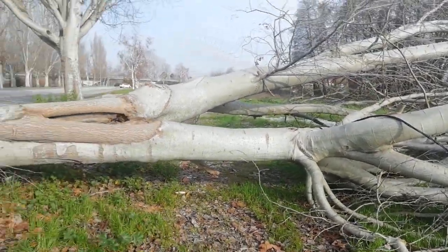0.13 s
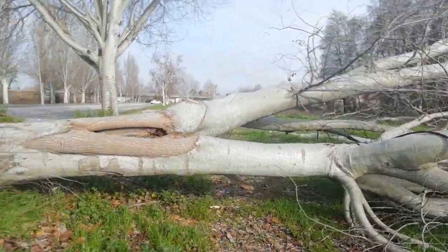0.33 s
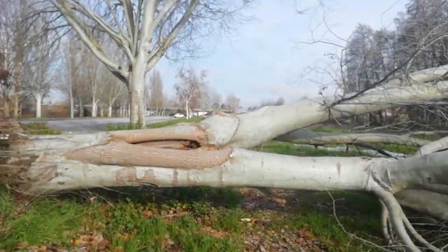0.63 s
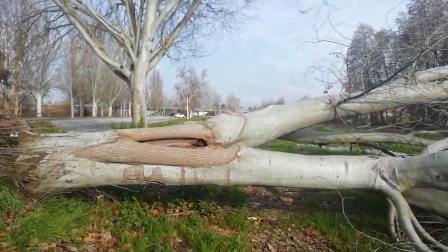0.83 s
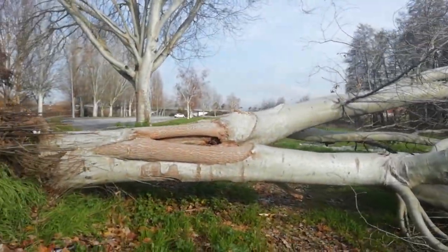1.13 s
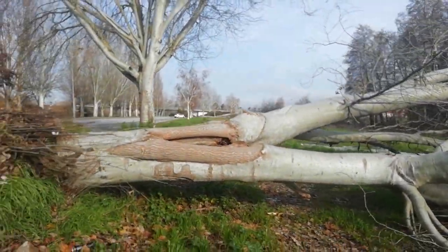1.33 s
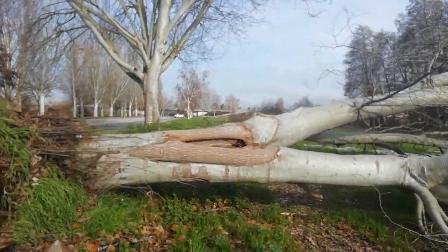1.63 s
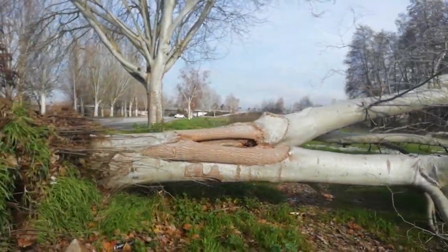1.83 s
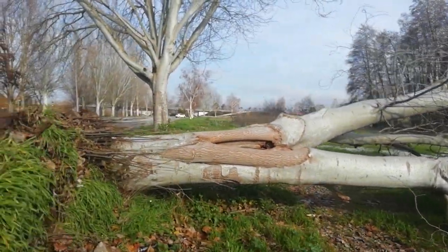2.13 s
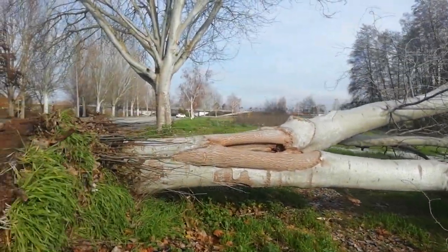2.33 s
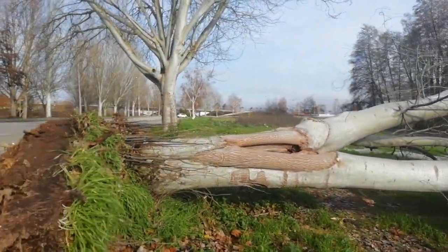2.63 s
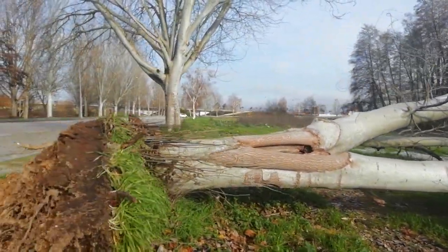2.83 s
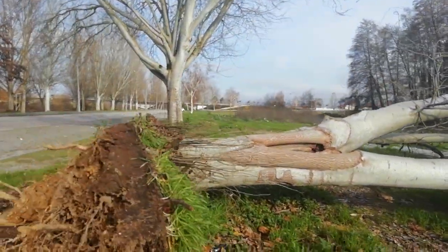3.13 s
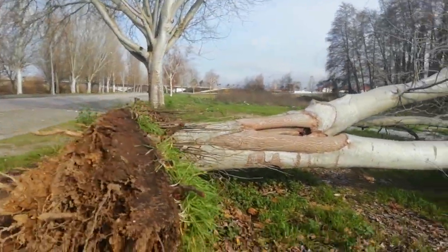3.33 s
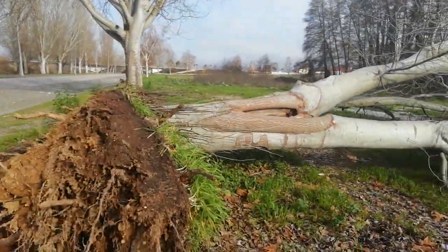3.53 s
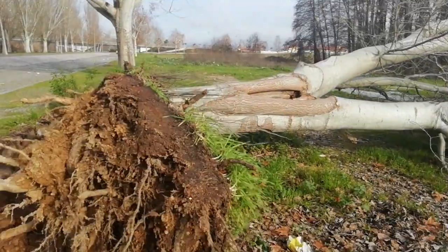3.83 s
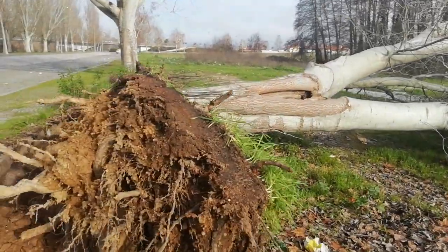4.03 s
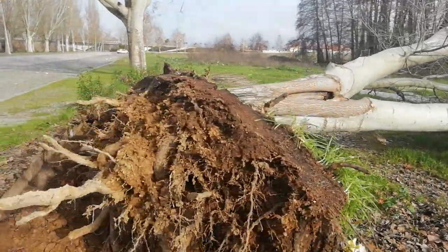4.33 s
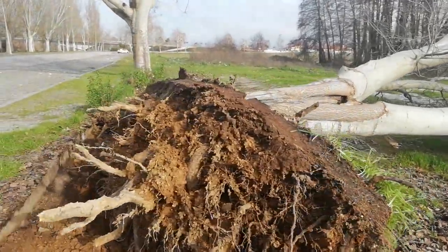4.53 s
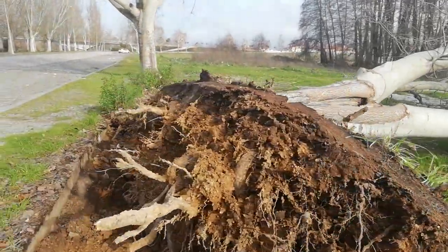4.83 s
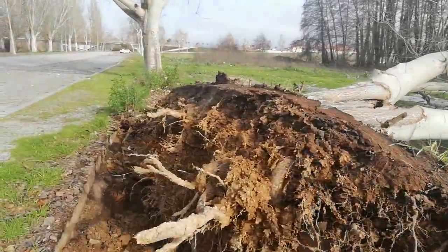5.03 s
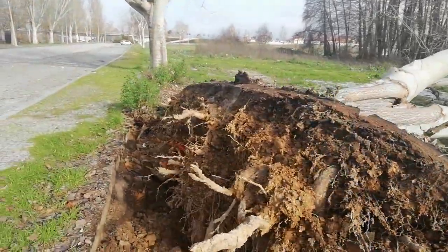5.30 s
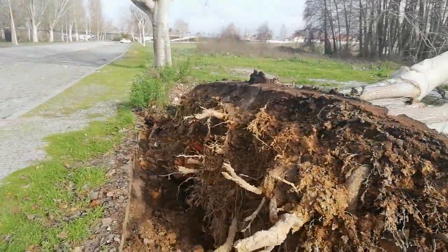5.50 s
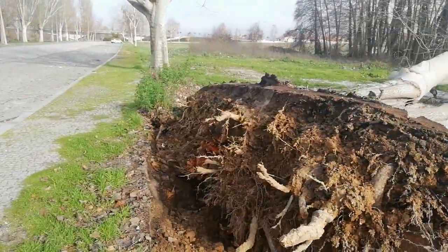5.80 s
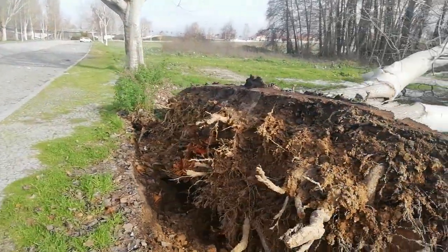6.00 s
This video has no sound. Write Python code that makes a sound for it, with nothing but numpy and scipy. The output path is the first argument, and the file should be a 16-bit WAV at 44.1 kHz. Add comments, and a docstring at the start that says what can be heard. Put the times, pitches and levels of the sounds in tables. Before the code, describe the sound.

A person walks at an unhurried pace through crisp litter outdoors, about eight steps in six seconds. Leaves rustle brightly, stalks click and small twigs crack; long grass rasps against the shoes. The crunch near five seconds is the strongest. Two very short, high gliding bird calls sit faintly to the left, over low distant tyre and engine rumble and slight hiss. The open-air stereo microphone is close to the feet, with a sharp treble.

```python
"""Slow footsteps cross grass, dead leaves and twigs: each one thuds softly, crushes litter and brushes leaves.
Litter and rasping long grass are showers of tiny ringing breaks, driven by the swell of every step and brush.
Twigs and stalks snap as short runs of parting fibres; the soft soil is filtered noise.
A small bird whistles two short gliding calls, echoed by a faint wash.
Behind it all lie distant tyres and rumbling engines, both coloured noise, and a faint hiss."""
import sys
import numpy as np
from scipy import signal
from scipy.fft import rfft, irfft
from scipy.io import wavfile
from scipy.ndimage import uniform_filter1d, map_coordinates

SR = 44100
rng = np.random.default_rng(int(sys.argv[2]) if len(sys.argv) > 2 else 0)


def generate_wav(sig):
    """Save sig (samples, or channels by samples) to the path in sys.argv[1] as 16-bit PCM at SR."""
    pcm = np.round(np.clip(np.atleast_2d(sig).T, -1, 1) * 32767).astype(np.int16)
    wavfile.write(sys.argv[1], SR, pcm)


N = 271656
TIME = np.arange(N) / SR

# A sole comes down; attacks and releases span 20 dB, side is left minus right:
# (full weight [s], attack [s], hold [s], leaf rustle [dB], crunch [dB], soil thud [dB], side [dB])
STEPS = [(0.176, 0.0085, .075, -41, -42.5, -67, 1), (1.1, .074, .008, -31.5, -42.5, -62, 0.5),
         (1.858, 0.01612, .055, -55, -37.5, -50, -2), (2.745, .028, .04, -38, -44.5, -63, -0.5),
         (3.535, .1, .012, -37.5, -40.5, -50, 0.5), (4.206, .045, .024, -32, -40.5, -55, -1),
         (4.927, .064, 0.004, -30, -33, -48.5, -0.5), (5.55, 0.005, .032, -34, -38, -57, -1.5)]
STEP_RELEASE_S = .06
SETTLE_DB, SETTLE_RELEASE_S = -13, .27   # the litter goes on giving way under the weight
# A moving foot brushes through the litter:
# (peak [s], attack [s], release [s], leaf rustle [dB], crunch [dB], side [dB])
BRUSHES = [(0.31, 0.13, .07, -52, -55, 0.5), (0.665, 0.53, 0.055, -58, -63, -4),
           (1.26, 0.086, .28, -46.5, -55, -1.5), (1.44, .04, .3, -38.5, -49, -5),
           (1.782, 0.015, .07, -47, -58, -1), (1.908, .055, 0.061, -39, -44, 4),
           (1.965, 0.03, .16, -38.5, -42.5, 0.5), (2.06, 0.07, 0.11, -43, -49, 1.5),
           (2.26, 0.2, .11, -46, -50, -4.5), (2.61, 0.14, 0.42, -52, -61, -1),
           (2.875, 0.0517, .06, -40, -44, -1), (2.99, 0.11, .15, -41, -49, -6),
           (3.168, 0.12, .035, -45, -58.5, -4.5), (3.762, 0.04, 0.03, -49, -56, -5),
           (4.345, 0.062, .2, -44, -51.5, -2.5), (4.495, 0.19, 0.033, -41, -54, -6.5),
           (4.584, 0.013, .07, -39, -71, -13), (4.636, 0.022, .025, -38, -43, -2),
           (4.815, .02, .045, -30.5, -38.5, 1), (5.07, .12, 0.13, -46, -55.5, -5.5),
           (5.178, 0.037, .02, -38, -51, -6), (5.32, 0.038, .4, -56, -70, -5),
           (5.83, 0.36, .11, -41.5, -46.5, -8), (5.93, 0.03, .05, -43, -62, -17),
           (6.06, 0.076, .07, -49, -68, -8)]
STIR_LEAVES_DB, STIR_CRUNCH_DB = -71, -70   # trodden grass springing back, a steady floor


def feet():
    """Steps and brushes add in power to a leaf level, a crunch level and a power-weighted side, all in dB."""
    gestures = [(np.ones(N), STIR_LEAVES_DB, STIR_CRUNCH_DB, 0)]
    for s, attack_s, hold_s, leaves_db, crunch_db, _, side_db in STEPS:
        landing = swell(s, attack_s, hold_s, STEP_RELEASE_S)
        settling = from_db(SETTLE_DB) ** 2 * swell(s, attack_s, hold_s, SETTLE_RELEASE_S)
        gestures.append((landing + settling, leaves_db, crunch_db, side_db))
    for s, attack_s, release_s, leaves_db, crunch_db, side_db in BRUSHES:
        gestures.append((swell(s, attack_s, 0, release_s), leaves_db, crunch_db, side_db))

    shapes, leaves_db, crunch_db, side_db = map(np.array, zip(*gestures))
    leaves, crunch = from_db(leaves_db) ** 2, from_db(crunch_db) ** 2
    both = leaves + crunch
    side = (both * side_db) @ shapes / (both @ shapes)
    return 10 * np.log10(leaves @ shapes), 10 * np.log10(crunch @ shapes), side


# Colour of dry leaves, shared by the long grass: (frequency [Hz], level [dB])
LEAVES = [(500, -1.5), (2500, -4), (4500, -0.5), (9000, 0.5), (11000, -7), (16000, -14)]
# Colour of the litter crushed under the sole: (frequency [Hz], level [dB])
CRUNCH = [(200, 9), (600, -7), (1050, -2.5), (1750, -0.5), (3100, 1.5), (4800, -5), (12000, -21)]


def litter(leaves_db, crunch_db, side_db):
    """Leaves and grass rustle brightly, the crush under the sole is lower, and bent stalks tick sparsely."""
    leaves = crackle(leaves_db, per_s=7000, crowding=.7, spread_db=1.5, low_hz=3000, high_hz=14000,
                     cycles=7.9, patchy_db=3.0, scatter_db=-1.5, lag_spread=0.24, spectrum=LEAVES)
    crunch = crackle(crunch_db, per_s=2600, crowding=.5, spread_db=2.0, low_hz=757, high_hz=3940,
                     cycles=8.3, patchy_db=3.0, scatter_db=-4, lag_spread=0.52, spectrum=CRUNCH)
    # ticks follow the leaves up to a ceiling
    ticks_db = np.minimum(leaves_db - 7, -53)
    ticks = crackle(ticks_db, per_s=70, crowding=0, spread_db=2.0, low_hz=2600, high_hz=11000,
                    cycles=6.5, patchy_db=2.0, scatter_db=2, lag_spread=0.3, spectrum=LEAVES)
    return (leaves + crunch + ticks) * panned(side_db)


# A shoe drags through long grass and the blades rasp:
# (peak [s], attack [s], release [s], level [dB], centre pitch [Hz])
RASPS = [(1.469, 0.067, 0.2, -45.5, 3180), (1.75, 0.065, 0.12, -51.5, 2600), (2.969, 0.12, .09, -46, 5300),
         (3.151, 0.15, .24, -48.5, 3190), (4.582, 0.012, 0.094, -42.5, 5100), (4.63, 0.026, .12, -45, 3820),
         (5.85, .14, 0.05, -44, 4100), (5.93, 0.033, 0.0482, -47, 3950)]
RASP_SIDE_DB, RASP_WIDTH = -5.5, 0.088   # width each way is a share of the pitch


def long_grass():
    """Blades slip over the shoe in a narrow, grainy band whose pitch slides from one drag into the next."""
    powers = []
    for s, attack_s, release_s, level_db, _ in RASPS:
        powers.append(from_db(level_db) ** 2 * swell(s, attack_s, 0, release_s))
    powers = np.array(powers)
    power = powers.sum(axis=0)
    hz = np.array(RASPS)[:, -1] @ powers / power   # the louder drag sets the pitch
    blades = crackle(10 * np.log10(power + 1e-12), per_s=700, crowding=.2, spread_db=2.5,
                     low_hz=hz * (1 - RASP_WIDTH), high_hz=hz * (1 + RASP_WIDTH),
                     cycles=7.2, patchy_db=1.0, scatter_db=-3, lag_spread=0.49, spectrum=LEAVES)
    return blades * panned(RASP_SIDE_DB)[:, None]


# Twigs breaking, levels before the twig colour:
# (time [s], bright crack level [dB], woody knock level [dB], knock pitch [Hz])
SNAPS = [(0.093, -45, -27, 2840), (0.1939, -17, -22.5, 1848), (0.2868, -15.5, -26, 3000),
         (0.3043, -21, -23, 3830), (0.3239, -33, -12.5, 2780), (1.8415, -48, -19.5, 1910),
         (1.8539, -45, -14.5, 2180), (1.8585, -44, -17, 2560), (1.87, -20, -14.5, 2790),
         (1.955, -10.5, -21, 3600), (2.2469, -26, -16, 4000), (2.38, -32, -20.5, 3430),
         (2.7829, -12, -16, 3530), (2.7937, -11, -11.5, 2400), (2.8801, -12, -15, 4430),
         (2.9333, -11.5, -9, 5460), (2.972, -12.5, -13, 5500), (3.0522, -30, -19, 3260),
         (3.098, -15.5, -19.5, 3230), (3.2261, -25.5, -39, 3170), (3.3949, -22.5, -21.5, 3355),
         (4.5787, -12, -19, 4600), (4.635, -7.5, -27, 2130), (4.6558, -22.5, -25, 2110),
         (4.764, -17.5, -28, 1666), (4.8092, -17, -15.5, 1800), (5.92, -15, -33, 4130)]
# Dry grass stalks clicking as they break, levels before the twig colour:
# (time [s], level [dB], pitch [Hz])
CLICKS = [(0.0831, -26, 7840), (0.1715, -18, 8800), (0.233, -15.5, 8530), (0.2408, -19, 8800),
          (0.354, -23, 8850), (1.309, -33, 7950), (1.5414, -29, 8030), (1.9987, -11, 8560),
          (2.546, -21.5, 9500), (2.591, -11, 11000), (2.7143, -17, 7960), (2.855, -7, 10930),
          (3.54, -10, 8600), (4.1049, -25.5, 7570), (4.1344, -27, 9500), (4.2468, -29, 8500),
          (4.3948, -8.5, 8900), (4.4092, -12, 7380), (4.609, -11.5, 7300), (4.9062, -12, 7980),
          (4.9777, -14, 10000), (5.08, -26, 10600), (5.1812, -18.5, 7800), (5.2564, -15.5, 9100)]
# Colour of all snaps and clicks: (frequency [Hz], level [dB])
TWIG = [(1000, 3), (3000, 4.5), (9000, 2), (16000, -11)]


def twigs(side_db):
    """A twig gives a bright crack and a knock of the stick; a thin stalk only clicks."""
    s, crack_db, knock_db, knock_hz = np.transpose(SNAPS)
    crack_hz = np.full(len(s), 8400)
    cracks = snapping(s, crack_db, crack_hz, side_db, cycles=3.4, scatter_db=-2, scatter_t60=0.012)
    knocks = snapping(s, knock_db, knock_hz, side_db, cycles=6.5, scatter_db=-9, scatter_t60=0.006)
    clicks = snapping(*np.transpose(CLICKS), side_db, cycles=5.4, scatter_db=-5.5, scatter_t60=0.0047)
    return coloured(cracks + knocks + clicks, TWIG)


# Colour of the thud: (frequency [Hz], level [dB])
SOIL = [(60, 4), (350, 11), (600, 11.5), (1000, 7.5), (1600, 2), (4000, -50)]
# How alike the two sides are, for the soil and the traffic: (frequency [Hz], likeness [-1 to 1])
TRAFFIC_LIKENESS = [(150, 1), (300, 0.28), (640, -0.62), (1200, 0.33)]
SOIL_ATTACK_S, SOIL_RELEASE_S = 0.072, 0.16


def soil():
    """The soft ground gives way under each step with a dull puff of noise."""
    weight = np.zeros(N)
    for s, _, hold_s, _, _, soil_db, _ in STEPS:
        weight += from_db(soil_db) * np.sqrt(swell(s, SOIL_ATTACK_S, hold_s, SOIL_RELEASE_S))
    return weight * rms_one(coloured(stereo_noise(TRAFFIC_LIKENESS), SOIL))


# Thin wavering calls, levels before the wash: (start [s], top pitch [Hz], level [dB], side [dB])
BIRD_CALLS = [(1.349, 8070, -43.5, -9), (3.837, 8700, -50, -11)]
# Each call arches, drops and arches again: (time into the call [s], pitch [share of the top])
CALL_SHAPE = [(0, .8), (.008, .94), (.015, 1), (.021, .99), (.026, .84), (.031, .815), (.045, .92),
              (.056, .85)]
CALL_ATTACK_S, CALL_RELEASE_S = 0.0071, 0.13


def bird():
    """A pure whistle that swings up and down twice and lingers among the trees."""
    out = np.zeros((2, N))
    shape_s, share = np.transpose(CALL_SHAPE)
    for s, top_hz, level_db, side_db in BIRD_CALLS:
        age = TIME - s
        hz = top_hz * uniform_filter1d(np.interp(age, shape_s, share), size=128)
        # smoothed gate: no clicks at the ends
        voiced = uniform_filter1d(1. * (age > 0) * (age < shape_s[-1]), size=128)
        effort = np.sqrt(swell(s + CALL_ATTACK_S, CALL_ATTACK_S, 0, CALL_RELEASE_S))
        whistle = np.sin(2 * np.pi * np.cumsum(hz) / SR)
        out += panned(side_db)[:, None] * voiced * effort * from_db(level_db) * whistle
    return outdoors(out, wet_db=-4, t60=0.22)


# The road over time: (time [s], tyre level [dB], rumble level before its random sway [dB])
ROAD = [(0, -59.5, -54.5), (0.8, -61, -56), (1.6, -58.5, -53.5), (6.16, -56, -54)]
# Colour of far tyres: (frequency [Hz], level [dB])
TRAFFIC = [(120, -25), (200, 0.5), (340, -11.5), (600, -4), (1000, -2.5), (1500, -8), (2500, -18),
           (4500, -31)]
# Colour of far engines, before the drone is added: (frequency [Hz], level [dB])
RUMBLE = [(15, -15), (50, 2.5), (80, 0.5), (135, -8.5), (200, -21.5), (300, -18), (600, -36.5)]
# How alike the rumble is on both sides: (frequency [Hz], likeness [-1 to 1])
RUMBLE_LIKENESS = [(140, 1), (300, .64)]
SWAY_DB, SWAYS_PER_S = 2.5, 7   # the rumble swells and sinks at random


def background():
    """Far tyres and engines are coloured noise, with a resonant drone, over a faint even hiss."""
    tyres_db, rumble_db = in_time(ROAD)
    sway = map_coordinates(rng.standard_normal(size=128), [TIME * SWAYS_PER_S], order=1)
    tyres = from_db(tyres_db) * rms_one(coloured(stereo_noise(TRAFFIC_LIKENESS), TRAFFIC))
    rumble = coloured(stereo_noise(RUMBLE_LIKENESS), RUMBLE)
    droning = bell(rumble, hz=148.0, q=13.6, gain_db=8.3)
    engines = from_db(rumble_db + SWAY_DB * sway) * rms_one(droning)
    hiss_colour = [(3100, 0), (8000, -1), (11000, -22)]
    hiss = from_db(-70.5) * rms_one(coloured(rng.standard_normal((2, N)), hiss_colour))
    return tyres + engines + hiss


def crackle(level_db, per_s, crowding, spread_db, low_hz, high_hz, cycles, patchy_db, scatter_db,
            lag_spread, spectrum):
    """A shower of tiny breaks of uneven size; with crowding, more pressure breaks more of them each second."""
    rate = np.minimum(per_s * from_db(crowding * (level_db - level_db.max())), SR / 4)
    born = np.flatnonzero(rng.random(N) < rate / SR)
    s, pitch = born / SR, rng.random(N)
    size, side = rng.standard_normal((2, N))[:, born]
    # one leaf after another gives way, each favouring pitches of its own
    favour = map_coordinates(rng.standard_normal((256, 12)), [s * 35, pitch[born] * 11], order=1)
    # one break sets off its neighbours: strong and weak runs of a few milliseconds
    run = np.minimum(rng.standard_normal(N // 128 + 1), 2)[born // 128]
    strength_db = spread_db * np.minimum(size, 2) + patchy_db * favour + 2.2 * run
    # crowded breaks are each weaker, so the level alone sets the loudness
    gains = from_db(strength_db) / np.sqrt(rate[born]) * panned(3 * side)
    hz = (low_hz + (high_hz - low_hz) * pitch)[born]
    grains = fractures(s, gains, hz, cycles, scatter_db, 0.075, lag_spread, size=160)
    return from_db(level_db) * rms_one(coloured(grains, spectrum))


FIBRE_GAP_S, FIBRE_LOSS_DB = .0008, 7   # mean spacing before jitter; loss from one fibre to the next


def snapping(s, level_db, hz, side_db, cycles, scatter_db, scatter_t60, count=3):
    """Each break is a quick run of parting fibres, each weaker than the last, on the side of the moving foot."""
    fibre = np.arange(count)
    delay, stiffness = rng.uniform(-1.2, 1, (len(s), 2, count)).transpose(1, 0, 2)
    times = (s[:, None] + FIBRE_GAP_S * fibre * (1 + .5 * delay)).ravel()
    pitches = (hz[:, None] * (1 + 0.016 * stiffness)).ravel()
    shares = from_db(-FIBRE_LOSS_DB * fibre)
    shares = shares / np.linalg.norm(shares)
    gains = np.outer(from_db(level_db), shares).ravel() * panned(np.interp(times, TIME, side_db))
    return fractures(times, gains, pitches, cycles, scatter_db, scatter_t60, lag_spread=0.11, size=512)


PORT_LAG_S = .00012   # mean lag of the right side


def fractures(s, gains, hz, cycles, scatter_db, scatter_t60, lag_spread, size):
    """Each break rings a few cycles, mostly later on the right, and is scattered by the litter around it."""
    t = np.arange(size) / SR
    lag = PORT_LAG_S * (1 + lag_spread * rng.standard_normal(len(s)))
    arrival = np.maximum([-lag, lag], 0)[..., None]
    age = np.maximum(t - arrival, 0) * hz[:, None]   # in cycles
    ring = np.sin(2 * np.pi * age) * from_db(-60 * age / cycles)
    ring = unit_energy(np.diff(ring, prepend=0))
    # echoes start just after the direct ring
    echoes = rng.standard_normal(ring.shape) * from_db(-60 * t / scatter_t60) * (t > .0003)
    scatter = unit_energy(signal.fftconvolve(ring, echoes, axes=-1)[..., :size])
    waves = unit_energy(ring + from_db(scatter_db) * scatter) * gains[..., None]
    # add every wave at its own place in time
    at = (s * SR).astype(int)[:, None] + np.arange(size)
    return np.array([np.bincount(at.ravel(), w.ravel(), N + size)[:N] for w in waves])


FLANK_CURVE = 1.35   # above 1, a gesture has a round top and steep skirts


def swell(peak_s, attack_s, hold_s, release_s):
    """Power of one gesture: it rises 20 dB in the attack, holds, and falls 20 dB in the release."""
    early = np.maximum(peak_s - TIME, 0) / attack_s
    late = np.maximum(TIME - peak_s - hold_s, 0) / release_s
    return from_db(-20 * np.minimum(early + late, 10) ** FLANK_CURVE) ** 2


def outdoors(x, wet_db, t60, size=8192):
    """Ground, trunks and branches send back a faint, short wash of decaying noise."""
    tail = rng.standard_normal((2, size)) * from_db(-60 * np.arange(size) / SR / t60)
    tail /= np.sqrt(np.sum(tail ** 2, axis=1, keepdims=True))
    return x + from_db(wet_db) * signal.oaconvolve(x, tail, axes=1)[:, :N]


def stereo_noise(likeness):
    """White noise whose two sides are alike by the given share at each frequency."""
    alike = np.clip(at_hz(likeness, np.arange(N // 2 + 1) * SR / N), -1, 1)
    mid, side = rfft(rng.standard_normal((2, N)))
    return irfft(np.sqrt(1 + alike) * mid + np.sqrt(1 - alike) * side * [[1], [-1]], N)


def coloured(x, spectrum, size=8192):
    """Causal (minimum-phase) filter with the given spectrum."""
    hz = np.arange(size // 2 + 1) * SR / size
    cepstrum = irfft(np.log(from_db(at_hz(spectrum, hz))))
    # fold the cepstrum onto positive time
    cepstrum[1:size // 2] *= 2
    cepstrum[size // 2 + 1:] = 0
    impulse = irfft(np.exp(rfft(cepstrum)))
    return signal.oaconvolve(x, impulse[None], axes=1)[:, :N]


def bell(x, hz, q, gain_db):
    """One resonance, or a notch if the gain is negative."""
    w, g = 2 * np.pi * hz / SR, from_db(gain_db / 2)
    a = np.sin(w) / (2 * q)
    zeros = [1 + a * g, -2 * np.cos(w), 1 - a * g]
    poles = [1 + a / g, -2 * np.cos(w), 1 - a / g]
    return signal.lfilter(zeros, poles, x)


def panned(side_db):
    """Left and right gains of constant power, from left minus right in dB."""
    gains = from_db(np.array([side_db, -side_db]) / 2)
    return gains / np.sqrt(np.mean(gains ** 2, axis=0))


def in_time(rows):
    """Each column of a curve at every sample."""
    s, *columns = np.transpose(rows)
    return [np.interp(TIME, s, c) for c in columns]


def at_hz(points, hz):
    """Read a spectrum on a log-frequency axis."""
    f, value = np.transpose(points)
    return np.interp(np.log(hz + 1), np.log(f), value)


def from_db(db):
    """Decibels to gain."""
    return 10 ** (np.asarray(db) / 20)


def rms_one(x):
    """Scale to rms 1."""
    return x / np.sqrt(np.mean(x ** 2) + 1e-20)


def unit_energy(x):
    """Scale each wave to energy 1."""
    return x / np.sqrt(np.sum(x ** 2, axis=-1, keepdims=True) + 1e-20)


def scene():
    """Steps close by, bird and road farther off."""
    leaves_db, crunch_db, side_db = feet()
    ground = litter(leaves_db, crunch_db, side_db) + long_grass() + twigs(side_db)
    return outdoors(ground, wet_db=-11, t60=0.055) + soil() + bird() + background()


# Microphone port resonances, a list for the left and one for the right:
# (frequency [Hz], sharpness [Q], gain [dB])
PORTS = [
    [(8740, 4.33, 10)],
    [(7780, 4.63, 8.5)],
]
CUTOFF_HZ = 16000


def record(dry):
    """Each microphone port rings in the treble; a steep low-pass cuts the top."""
    sides = []
    for x, port in zip(dry, PORTS):
        for hz, q, gain_db in port:
            x = bell(x, hz, q, gain_db)
        sides.append(x)
    low_pass = signal.ellip(10, .1, 70, CUTOFF_HZ, fs=SR, output="sos")
    return signal.sosfilt(low_pass, sides)


dry = scene()
out = record(dry)
generate_wav(out)
```